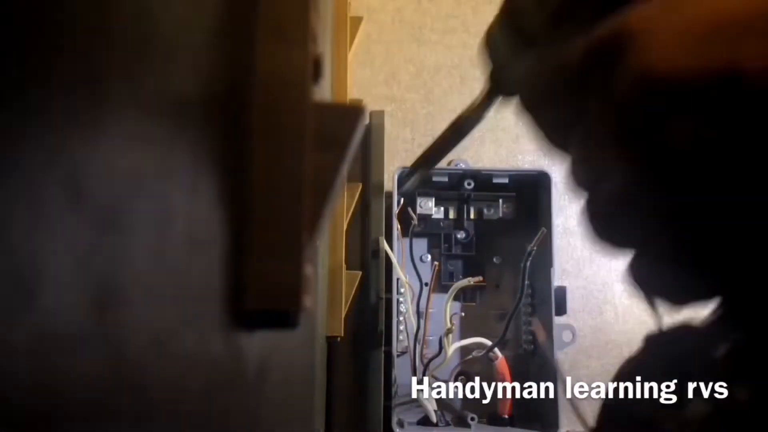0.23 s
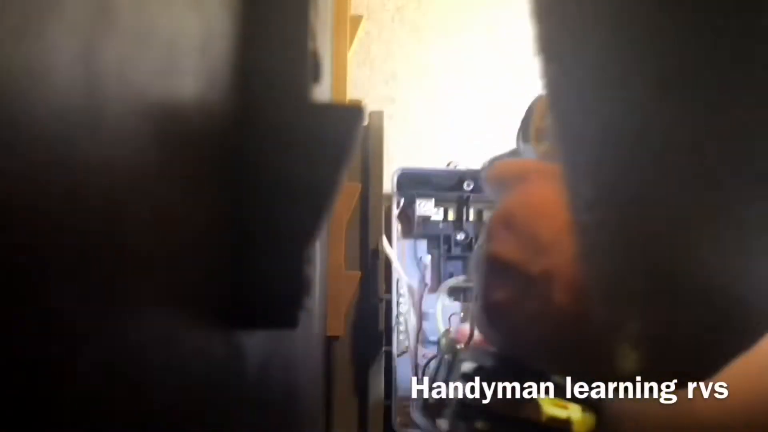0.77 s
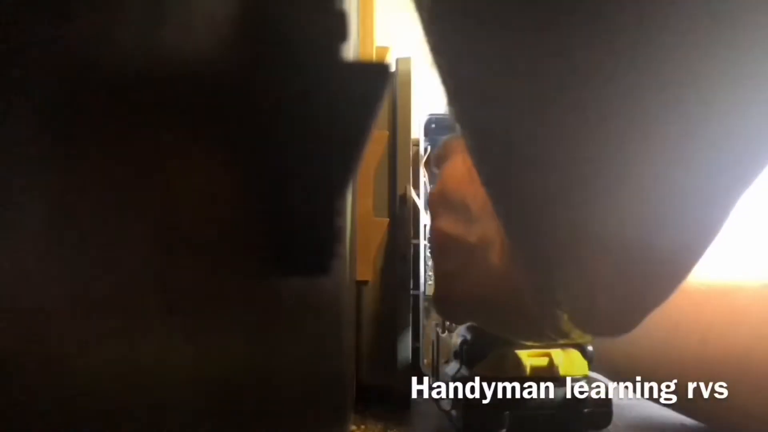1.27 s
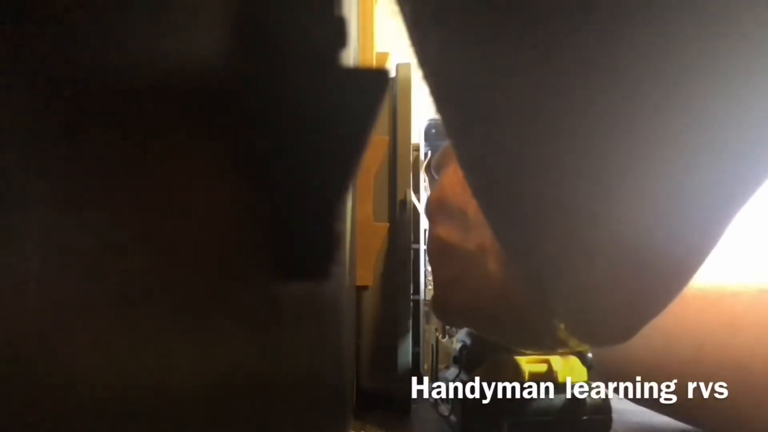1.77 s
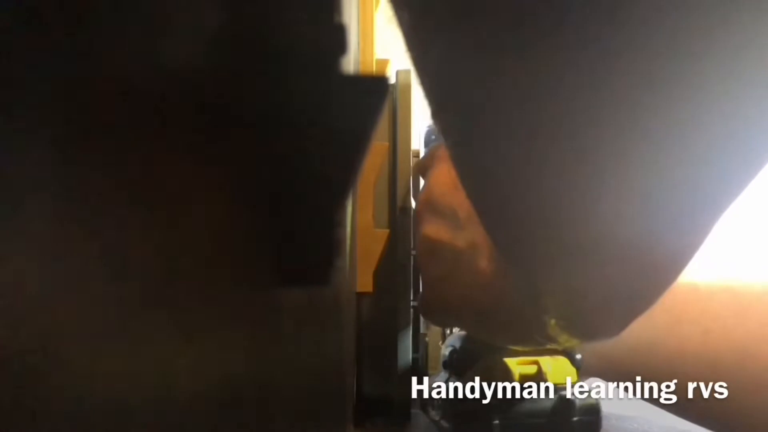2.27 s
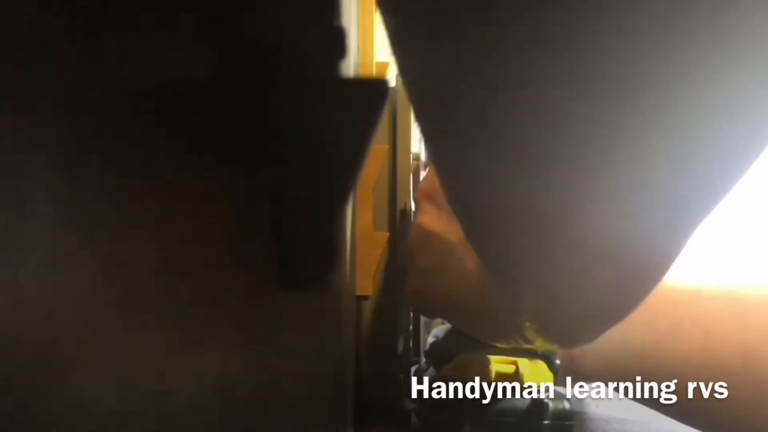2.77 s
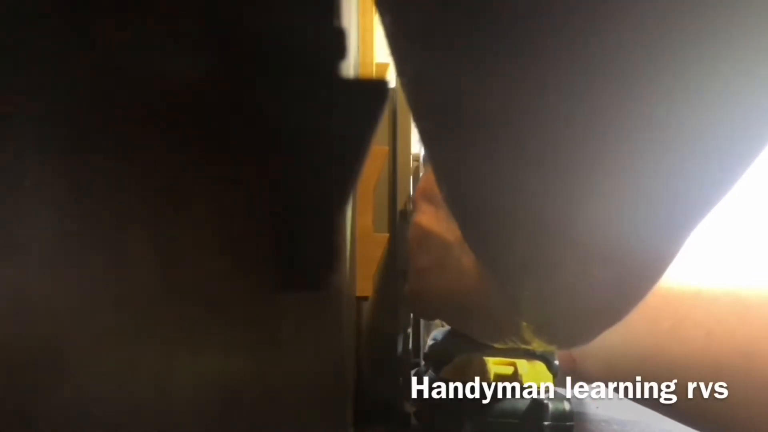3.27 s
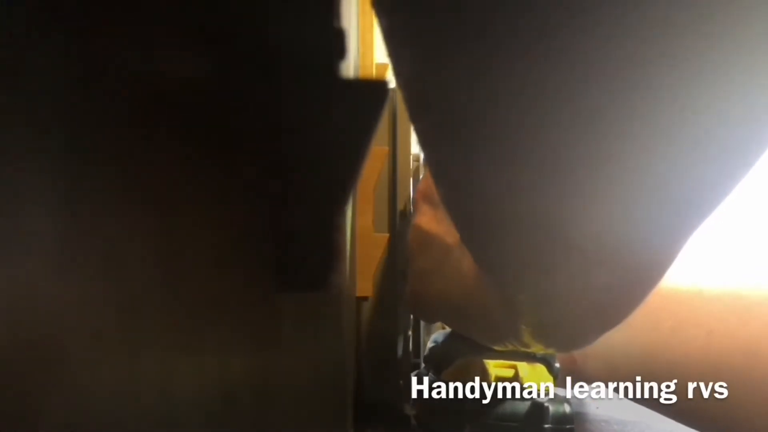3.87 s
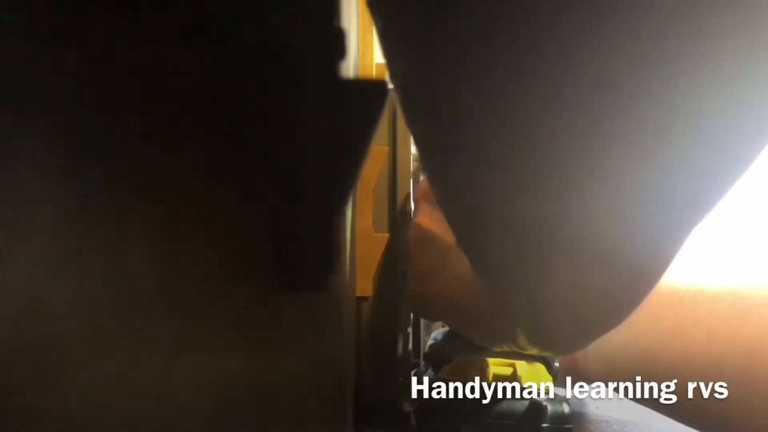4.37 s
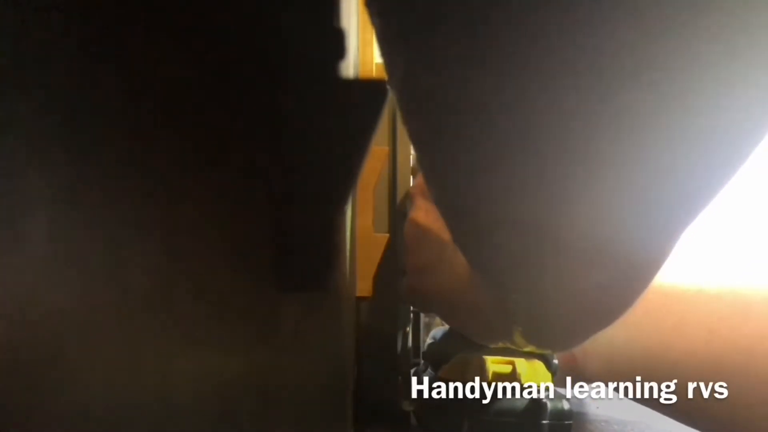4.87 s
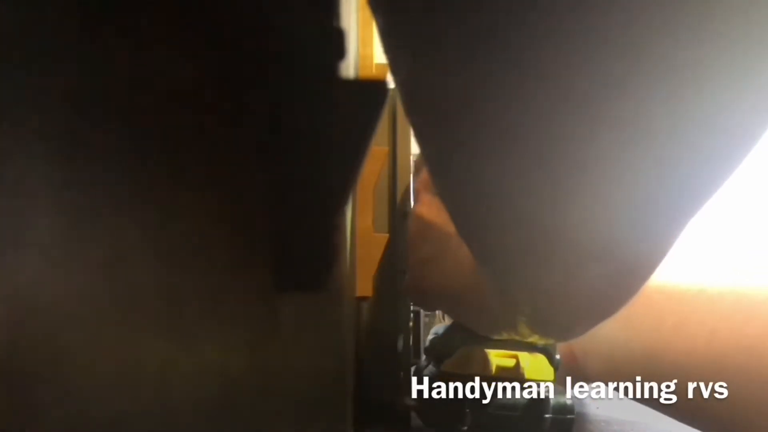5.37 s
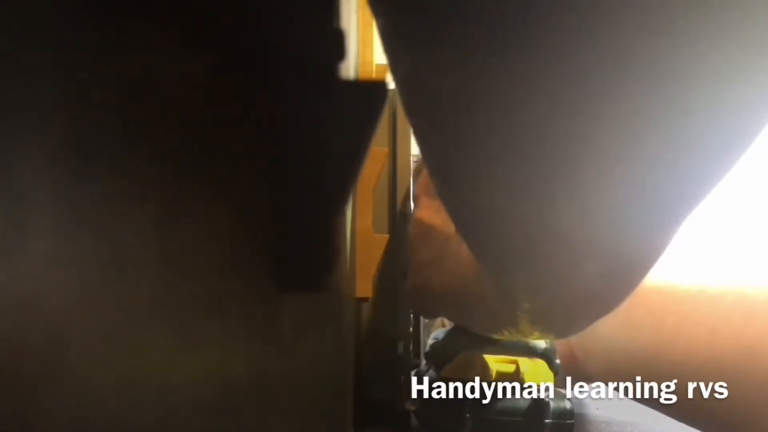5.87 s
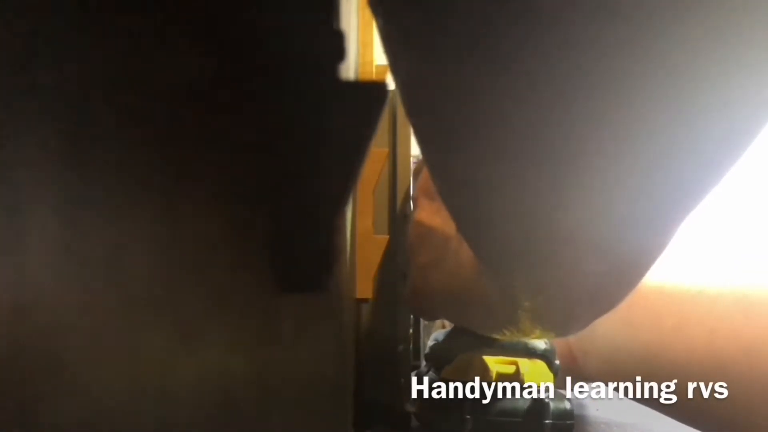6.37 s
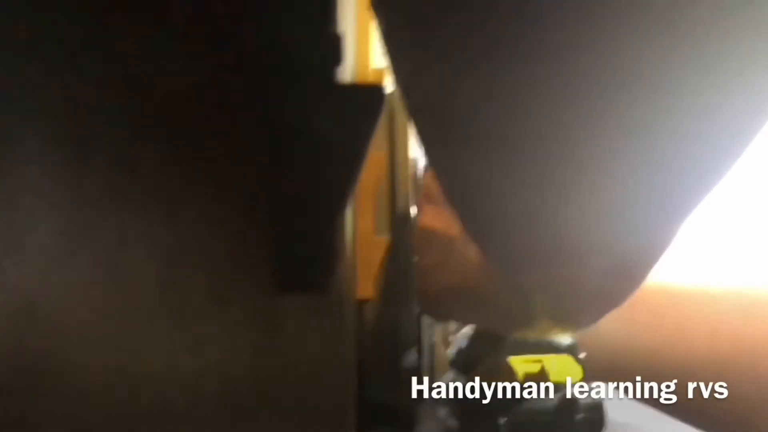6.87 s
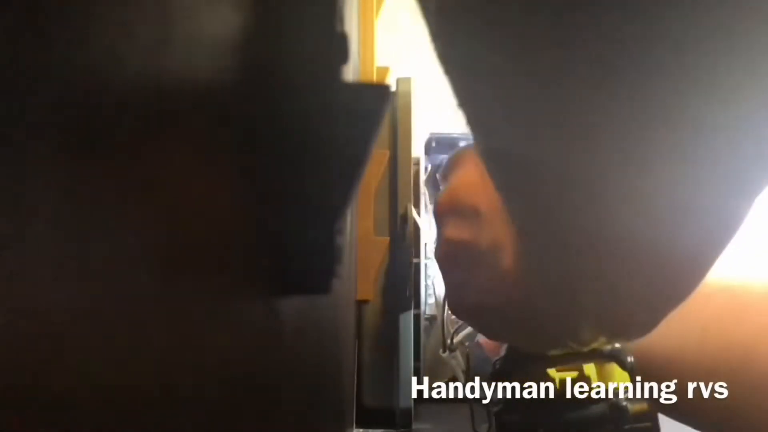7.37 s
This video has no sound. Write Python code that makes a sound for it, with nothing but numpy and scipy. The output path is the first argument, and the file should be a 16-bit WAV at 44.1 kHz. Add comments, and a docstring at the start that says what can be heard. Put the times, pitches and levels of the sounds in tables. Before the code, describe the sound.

Hard knocks and clattering clicks on a hollow panel close up, then lighter fumbling taps, wire scrapes and short whining cordless driver bursts.

```python
"""Knocks and clicks on a terminal panel, as hands work a wire and a driver bit into it close to the microphone.
Each blow is a noise burst shaped band by band, rung through the panel's modes and answered by the cupboard.
A cordless driver runs in five short bursts: gear noise, panel shake and a pulse-width whine.
Underneath, grainy noise makes the rumble of handling, the scrape of wires and the rustle of cloth.
The loudest blows overload the recorder."""
import sys
import numpy as np
from scipy import signal
from scipy.fft import rfft, irfft
from scipy.io import wavfile
from scipy.ndimage import uniform_filter1d

SR = 44100
rng = np.random.default_rng(int(sys.argv[2]) if len(sys.argv) > 2 else 0)


def to_wav(sig):
    """Store sig (one row per channel, or 1-D mono) as 16-bit WAV at the path in sys.argv[1].

    Samples outside -1..1 are clipped; the rate is SR.
    """
    pcm = np.clip(np.atleast_2d(sig), -1, 1) * 32767
    pcm = np.round(pcm).astype(np.int16)
    wavfile.write(sys.argv[1], SR, pcm.T)  # frames by channels


N = 336042

# cupboard and panel wall, response to a blow; contact time lengthens rise and decays:
# (f/Hz, level/dB, rise/s, first decay/s, echo/dB, echo t60/s)
SPACE = [(59.7, -19, 0.039, 0.034, -10.5, 0.16), (242, -0.6, 0.018, 0.0089, -9.5, 0.18),
         (1037, -1.2, 0.002, 0.0027, -14, 0.18), (3830, -1.5, 0.0003, 0.00051, -7, 0.11),
         (7570, -2.5, 0.00011, 0.00047, -11.5, 0.093), (15500, -5, 0.00016, 0.00024, -13.5, 0.12)]
# centres of the bands shaped apart [f/Hz]
BANDS_HZ = [60, 120, 240, 480, 960, 1900, 3800, 7600, 15000]
# centres of thump, blow, click, tick [f/Hz]
COLOUR_HZ = [220, 1100, 4000, 11000]
FIRM_S = .006  # contact of a firm knock
RING_DB = 5.0  # how far the modes stand out of a blow
SPOT_DB, SPOT_WIDTH_LOG, SPOT_SPREAD_DB = 20.0, 0.12, 4


def knocks(size=8192):
    """Every blow has its own colour; its treble starts and dies first, its bass swells and lingers."""
    s, db, thump, click, tick, pitch_hz, contact_s = blows().T[:, :, None]
    t = np.arange(size) / SR
    hz = np.fft.rfftfreq(size, 1 / SR)
    grit, chatter = rng.standard_normal((len(s), 2, size)).transpose(1, 0, 2)
    # the parts rattle as they settle
    chatter = amp(1.5 * evened(uniform_filter1d(chatter, size=60)))
    # landing spot: modes near the pitch move most
    mode_hz = np.transpose(PANEL)[0]
    near = np.exp(-(np.log(mode_hz / pitch_hz) / SPOT_WIDTH_LOG) ** 2)
    spot_db = SPOT_DB * near + SPOT_SPREAD_DB * rng.standard_normal(near.shape)
    spectrum = rfft(grit) * ringing(hz, RING_DB + spot_db)
    colours = np.hstack([thump, 0 * db, click, tick])
    # a long contact is a short scrape: it swells and lasts
    soft = contact_s / FIRM_S
    swell_s = .0008 * soft ** 3
    out = 0
    for k, centre in enumerate(BANDS_HZ):
        one_band = np.arange(len(BANDS_HZ)) == k
        share = read(np.c_[BANDS_HZ, one_band], hz) * (hz > 40)
        band_db, rise_s, first_s, echo_db, t60_s = (
            read(np.array(SPACE)[:, [0, c]], centre) for c in range(1, 6))
        colour_db = np.array([read(np.c_[COLOUR_HZ, c], centre) for c in colours])[:, None]
        first_decay = np.exp(-t / (first_s + 0.58 * contact_s))
        echo = amp(echo_db - 60 * t / (t60_s * soft ** 0.52))
        shape = (1 - np.exp(-t / (rise_s + swell_s))) * (first_decay + echo)
        part = irfft(spectrum * share) * chatter * shape
        # band energy set to that of its envelope
        level = np.sqrt((shape ** 2).sum(1) / (part ** 2).sum(1))[:, None]
        out = out + part * amp(db + band_db + colour_db) * level
    fade_out = np.minimum(1, (t[-1] - t) / 0.035)
    return place(s[:, 0], out * fade_out)


# hands, wire and bit on panel and screw; thump, click, tick relative to the blow:
# (t/s, blow level/dB, thump/dB, click/dB, tick/dB, pitch f/Hz, contact/s)
KNOCKS = [(0.193, -20.5, -13.5, -14, -11.5, 1490, 0.009), (0.442, -2.5, -6.5, -18, -25.5, 810, 0.0082),
          (0.465, -3, -9, -45, -30, 861, 0.0082), (0.597, -41, -6, 16, 4, 1710, 0.0099),
          (0.717, -31, -6, 2, 2, 1300, 0.015), (0.759, -19.5, -6, -11, 1.5, 1320, 0.018),
          (0.915, -3, 3, -68, -26, 1120, 0.0084), (0.937, -0.5, -8, -33, -27, 860, 0.0096),
          (0.996, -18.5, -1, -12, -0.5, 694, 0.002), (1.041, -16, 4.5, 2.5, -2.5, 1110, 0.0095),
          (1.084, -3.5, -3.5, -18, -26, 1080, 0.0064), (1.118, -5.5, -5, -52.5, -30, 660, 0.015),
          (1.155, -9, -18.5, -12, 2, 800, 0.002), (1.171, 11, -10.5, -69, -24, 1100, 0.0018),
          (1.182, -14.5, -8, -13, 2, 686, 0.0031), (1.195, -4, -2, -32, -23, 829, 0.0077),
          (1.209, -20.5, -13, 1.5, -3, 685, 0.0089), (1.241, -19, -4.5, -22, -4, 1120, 0.0036),
          (1.293, -10, -16, -1, 1.5, 1440, 0.00067), (1.334, -8.5, -5, -22, -32, 1380, 0.048),
          (1.492, -11, -3.5, -4.5, -11.5, 1687, 0.0085), (1.541, -22.5, -11, 4.5, -11, 1510, 0.0094),
          (1.734, -20, -7, 2, -7, 1230, 0.0039), (1.747, -4, -6.5, -15, -5, 1070, 0.0073),
          (1.861, -26, -8, -14, -55, 894, 0.0072), (1.904, -16.5, 3, -3.5, -14, 1010, 0.011),
          (1.915, -12.5, -30, -3, -7.5, 1490, 0.0086), (2.004, -21.5, 3.5, -1.5, -12, 1240, 0.012),
          (2.031, -9.5, -14, -21, -25, 1210, 0.004), (2.161, -30, -14, -4, -19, 1230, 0.0079),
          (2.286, -27, 7.5, -3.5, -8, 1820, 0.0067), (2.492, -15.5, 6.5, -37, -16, 860, 0.005),
          (2.597, -19, -11, -14.5, -27, 1590, 0.012), (2.643, 2, -18, -41, -34, 848, 0.0049),
          (2.672, -20, 12.5, 0, -16, 1600, 0.0076), (2.707, -14, 0, -44, -37, 653, 0.002),
          (2.837, -24, 1.5, -40, -62, 1230, 0.014), (2.919, -19, -1, -25, -45, 720, 0.022),
          (2.96, -22, 6.5, -15, -37, 1140, 0.0073), (3.071, -20, 6, -54, -35, 659, 0.0039),
          (3.083, -25, -8, -11, -35, 615, 0.013), (3.1, -26, 5, -7.5, -20, 1710, 0.012),
          (3.177, -25.5, -1, -24, -45, 1460, 0.016), (3.346, -21.5, 7, -11, -11.5, 1230, 0.0075),
          (3.536, -19.5, -3.5, -24, -44, 710, 0.015), (3.563, -18.5, -12, -14, -33, 715, 0.011),
          (3.654, -30.5, 3, -41, -33, 1160, 0.006), (3.723, -29, 8, -18, -28.5, 1210, 0.0054),
          (3.673, -23, 7, -2.5, -33, 1240, 0.005), (3.879, -32, 10.5, -2.5, -18, 1030, 0.0054),
          (3.905, -28, -3, -19, -18, 640, 0.013), (4.075, -21.5, 3, -44, -44, 694, 0.026),
          (4.143, -29, 7, -11.5, -15, 1220, 0.0056), (4.22, -9, -9.5, -13, -54, 1210, 0.006),
          (4.292, -17.5, 1.5, -10.5, -12.5, 1120, 0.0074), (4.38, -18.5, -12, -20, -31, 1450, 0.011),
          (4.427, -28.5, 9.5, -33, -44, 824, 0.02), (4.581, -50.5, -18, 2, -4, 880, 0.0058),
          (4.596, -22.5, 6.5, -69, -36, 653, 0.0027), (4.662, -30, -5, -6, -20, 1480, 0.02),
          (4.687, -20, 2.5, -6, -13, 1580, 0.0088), (4.704, -21, 5, 9.5, 4, 1500, 0.0045),
          (4.812, -19.5, 2.5, -18, -9, 1040, 0.0076), (4.846, -22.5, 3.5, -13, -20, 1030, 0.016),
          (4.889, -19, 0.5, -13, -17, 1180, 0.0062), (5.073, -38.5, 17, -7, -25, 1590, 0.011),
          (5.103, -10, 0.5, -9, -31.5, 1180, 0.007), (5.265, -28, -25, -17, -33, 1400, 0.004),
          (5.279, -44.5, 15, 3, 4.5, 840, 0.0017), (5.324, -16.5, 2, 2, -12, 780, 0.017),
          (5.359, -5.5, -3, -16, -14, 1240, 0.0051), (5.375, -12, 0, -0.5, -4, 1210, 0.014),
          (5.52, -24.5, 3.5, -23, -33, 1260, 0.0054), (5.573, -18, -22, -25, -52, 1580, 0.0034),
          (5.682, -28, 4.5, -57, -19, 710, 0.0023), (5.764, -26.5, -14, -19, -28, 690, 0.0084),
          (5.854, -34, 9.5, 4.5, -7, 716, 0.0048), (5.905, -32.5, 9.5, -10, -36, 840, 0.0078),
          (6.013, -37, 2, -10, -22.5, 690, 0.0056), (6.437, -12.5, -0.5, -34, -51, 720, 0.0021),
          (6.546, -38.5, -5, -7, -17, 797, 0.003), (6.56, -45.5, -7.5, 3, -4, 1505, 0.006),
          (6.936, -45.5, 2, -6, -12, 1290, 0.006), (6.982, -30, -14, -14, -17, 1260, 0.0038),
          (7.152, -19, 4.5, 2.5, -7, 1170, 0.0054), (7.296, -29.5, 4.5, -24, -8, 736, 0.0068),
          (7.364, -31.5, 3, -16.5, -27, 660, 0.006), (7.443, -49, -24, 5, -5, 764, 0.0082),
          (7.456, -30, 5, -38, -20, 697, 0.005)]
# clutch slipping evenly once the screw is tight: (first t/s, last t/s, first level/dB, last level/dB, slips)
CLUTCH = [(6.678, 6.763, -15, -20, 4), (7.012, 7.134, -21, -20, 5)]
# one clutch slip, relative to its blow: (thump/dB, click/dB, tick/dB, pitch f/Hz, contact/s)
SLIP = (5, 5.05, 1.1, 1300, 0.0072)
# one finger tap, relative to its blow: (thump/dB, click/dB, tick/dB)
FIDGET = (4, -20, -38)
FIDGETS_PER_S, FIDGET_DB, FIDGET_SPREAD_DB = 6, 8.5, 4  # levels over the scraping


def blows():
    """The knocks, the slips of the clutch and faint chance taps of busy fingers, one row a blow."""
    slips = []
    for first_s, last_s, first_db, last_db, count in CLUTCH:
        for point in np.linspace((first_s, first_db), (last_s, last_db), round(count)):
            slips.append((*point, *SLIP))
    when, size, spot = rng.random((round(FIDGETS_PER_S * N / SR), 3)).T
    when_s = when * N / SR
    s, _, scrape_db, _ = np.transpose(HANDS)
    # exponential spread: most taps faint
    db = np.interp(when_s, s, scrape_db) + FIDGET_DB - FIDGET_SPREAD_DB * np.log(1 - size)
    pitch_hz = 650 * 4.7 ** spot
    taps = [(a, b, *FIDGET, c, .007) for a, b, c in zip(when_s, db, pitch_hz)]
    return np.array([*KNOCKS, *slips, *taps])


# panel modes, level before the ring setting: (f/Hz, width/Hz, level/dB)
PANEL = [(116, 13, 2), (201.2, 6.9, 15), (272.3, 108, 0), (357.6, 27.5, -2.5), (508, 28, -5),
         (665, 11, -14), (784.4, 16, -11.5), (1126, 21, -10.5), (1230, 19, -8.5), (1587, 52, -6.5),
         (1823, 6.7, 4), (2194, 19, -13.5), (2665, 34, -10.5), (3522, 100, -3), (4557, 34, -4.5),
         (6540, 47, -23), (9520, 100, -4.5), (13500, 300, -3)]


def ringing(hz, ring_db):
    """The panel's modes as causal resonances added to the direct path."""
    f, width, db = np.transpose(PANEL)[:, :, None]
    return 1 + amp(ring_db + db[:, 0]) @ (width / (width + 2j * (hz - f)))


# trigger pulls: (pull t/s, at speed t/s, let go t/s, gears at speed level/dB, gears at let go level/dB,
#                 shaking level/dB, whine stop t/s, whine level/dB)
BURSTS = [(5.336, 5.362, 5.4, -21, -22, -15, 5.38, -25), (5.832, 5.87, 5.91, -35, -44, -30, 5.892, -33),
          (6.194, 6.25, 6.348, -19.5, -17.5, -17, 6.312, -24),
          (6.592, 6.642, 6.82, -7.5, -27, -21, 6.64, -21),
          (6.99, 7.014, 7.17, -20.5, -19.5, -21, 7.005, -50)]
# gear noise spectrum, relative, before the panel: (f/Hz, level/dB per Hz)
GEARS = [(290, -36), (500, -1.5), (855, 3.5), (946, -4), (1180, 5), (2390, -4), (3200, -0.5), (3490, -8),
         (4210, -7), (5710, -9), (6140, -14), (7530, -14.5), (16000, -28.5)]
# shaking spectrum, relative, before the panel: (f/Hz, level/dB per Hz)
SHAKE = [(18, -55), (30, -26), (53, -3.5), (155, -14), (199, -0.5), (417, -13.5), (461, -6), (600, -25.5),
         (780, -35), (1320, -120)]
# housing gain on the whine's harmonics: (multiple, level/dB)
OVERTONES = [(1, 3), (2, -7), (3, -12.5), (4, -12)]
SWITCHING_HZ = 3928
SPIN_UP_DB, COAST_DB_PER_S = -39, 537
SHAKE_LAG_S, SHAKE_COAST_DB_PER_S = 0.033, 341
WHINE_START_DB, WHINE_TOP, WHINE_END_DB = -20, 0.62, -8  # peaks at the top share of its run
ON_START, ON_END = 0.093, 0.56  # share of each cycle on, before the limit
ON_MIN, ON_MAX = .02, .5


def driver():
    """Gears grind, the tool shakes the panel and the controller chops the motor current into a whine."""
    t = np.arange(N) / SR
    spin, shaking, singing, on = [], [], [], np.zeros(N)
    for pull, fast, free, fast_db, free_db, shake_db, stop, whine_db in BURSTS:
        end = free + .2
        spin.append([(pull, fast_db + SPIN_UP_DB), (fast, fast_db),
                     (free, free_db), (end, free_db - .2 * COAST_DB_PER_S)])
        shaken = fast + SHAKE_LAG_S
        shaking.append([(pull, shake_db + SPIN_UP_DB), (shaken, shake_db),
                        (max(free, shaken), shake_db), (end, shake_db - .2 * SHAKE_COAST_DB_PER_S)])
        top = pull + WHINE_TOP * (stop - pull)
        singing.append([(pull, whine_db + WHINE_START_DB), (top, whine_db), (stop, whine_db + WHINE_END_DB)])
        on += np.interp(t, [pull, stop, stop + .01], [ON_START, ON_END, ON_END], 0, 0)
    gear_noise = grains(GEARS, grainy_db=3.5, patchy_db=3.0, ring_db=3.0, grain=30)
    shake_noise = grains(SHAKE, grainy_db=.1, patchy_db=1.5, ring_db=-6.0, size=2048)
    # narrow pulses are rich in overtones, wide ones are not
    on = np.clip(on, ON_MIN, ON_MAX)
    whine = 0
    for k, db in OVERTONES:
        pulse = np.sin(np.pi * k * on) / (k * np.sin(np.pi * on))
        whine = whine + amp(db) * pulse * np.cos(2 * np.pi * k * SWITCHING_HZ * t)
    gears = along(spin, lambda r: r[1]) * gear_noise
    shake = along(shaking, lambda r: r[1]) * shake_noise
    return gears + shake + np.sqrt(2) * along(singing, lambda r: r[1]) * whine


# handling through the panel, scraping, rustling: (t/s, handling level/dB, scraping level/dB, rustling level/dB)
HANDS = [(0, -61, -52.5, -56), (.18, -57, -50, -58), (.25, -33, -49.5, -53.5), (.85, -37.5, -35, -34.5),
         (1.1, -25.5, -21, -37), (1.28, -54, -44, -47), (1.5, -37.5, -47.5, -56), (1.7, -41.5, -54.5, -62),
         (2.1, -51, -51.5, -71), (2.2, -43, -43, -55), (2.55, -40, -38, -44), (2.75, -39.5, -56.5, -88),
         (3.75, -45.5, -55, -59.5), (4.05, -39.5, -47.5, -65), (4.299, -32, -55, -67),
         (4.552, -49.5, -65.5, -74.5), (4.85, -48, -48, -63.5), (5.2, -43, -51.5, -75),
         (5.5, -42, -50.5, -57.5), (5.85, -36, -55, -59), (6.151, -56.5, -64.5, -68),
         (6.42, -29.5, -50, -81), (6.95, -60, -65, -71.5), (7.22, -41, -45, -50.5), (7.62, -56, -58, -67.5)]
# handling spectrum, relative, before the panel: (f/Hz, level/dB per Hz)
RUMBLE = [(15, -50.5), (25, -34), (75, 2), (141, -11.5), (200, -1.5), (349, -8.5), (600, -19.5),
          (910, -39.5), (1540, -120)]
# scraping spectrum, relative, before the panel: (f/Hz, level/dB per Hz)
SCRAPE = [(200, -16), (500, 8), (1200, 10.5), (1700, 5.5), (2500, -4.5), (5000, -10.5), (9000, -67.5)]
# rustling spectrum, relative, before the panel: (f/Hz, level/dB per Hz)
RUSTLE = [(1200, -22), (3000, 7.5), (5000, -0.5), (9000, -2), (16000, -9.5)]


def hands():
    """Pressure on the panel rumbles, wires scrape and cloth rustles."""
    rumble = grains(RUMBLE, grainy_db=0, patchy_db=2.5, ring_db=-6.0, size=2048)
    scrape = grains(SCRAPE, grainy_db=3.5, patchy_db=2.5, ring_db=3.0, size=1024, grain=150)
    rustle = grains(RUSTLE, grainy_db=2.5, patchy_db=2.5, ring_db=2.0, size=1024, grain=80)
    layers = [rumble, scrape, rustle]
    return sum(along([HANDS], lambda r: r[k + 1]) * layer for k, layer in enumerate(layers))


def grains(colour, grainy_db, patchy_db, ring_db, size=512, grain=40):
    """Coloured noise, uneven over grain samples, with drifting patches, heard through the panel."""
    uneven = evened(uniform_filter1d(rng.standard_normal(N + size), size=round(grain)))
    noise = rng.standard_normal(N + size) * amp(grainy_db * uneven)
    hz, _, z = signal.stft(noise, SR, nperseg=size)
    # patches: random level smoothed over frequency, then time
    patches = rng.standard_normal(z.T.shape).T
    patches = uniform_filter1d(patches, size=6, axis=0)
    patches = evened(uniform_filter1d(patches, size=8, axis=1))
    z *= amp(read(colour, hz)[:, None] + patchy_db * patches)
    z *= abs(ringing(hz, ring_db))[:, None]
    return evened(signal.istft(z, SR, nperseg=size)[1][:N])


def amp(db):
    """Gain of a level in dB."""
    return 10 ** (np.asarray(db) / 20)


def evened(x):
    """Scaled to rms 1."""
    return x / np.sqrt(np.mean(x ** 2) + 1e-20)


def read(points, hz):
    """A table read along log frequency."""
    f, value = np.transpose(points)
    return np.interp(np.log(hz + 1), np.log(f + 1), value)


def along(tables, column):
    """Summed gain over time from dB tables, silent outside them."""
    t = np.arange(N) / SR
    gain = 0
    for table in tables:
        columns = np.transpose(table)
        gain = gain + amp(np.interp(t, columns[0], column(columns), -200, -200))
    return uniform_filter1d(gain, size=64)


def place(times, sounds):
    """Lays each sound down at its time."""
    out = np.zeros(N + sounds.shape[1])
    for s, sound in zip(times, sounds):
        out[round(s * SR):][:len(sound)] += sound
    return out[:N]


def scene():
    """All sources at one microphone."""
    return (knocks() + driver() + hands())[None]


EDGE_HZ = 16150


def record(dry):
    """The microphone loses the deep bass, peaks flatten at full scale; then the band limit."""
    heard = signal.sosfilt(signal.butter(3, 48, "highpass", fs=SR, output="sos"), dry)
    held = heard / (1 + abs(heard) ** 6) ** (1 / 6)
    band_limit = signal.firwin(511, EDGE_HZ, window=("kaiser", 9), fs=SR)
    return signal.oaconvolve(held, band_limit[None], "same")


dry = scene()
out = record(dry)
to_wav(out)
```